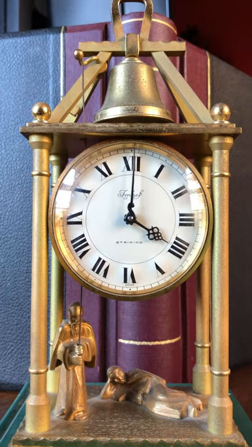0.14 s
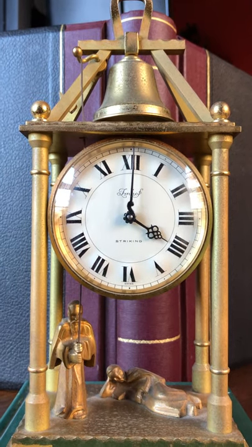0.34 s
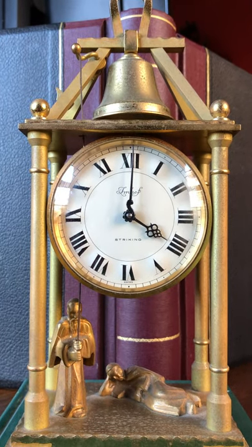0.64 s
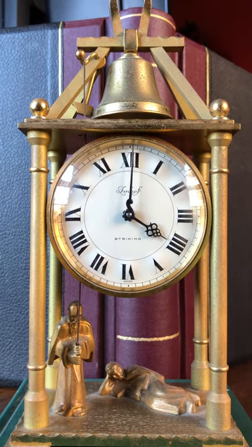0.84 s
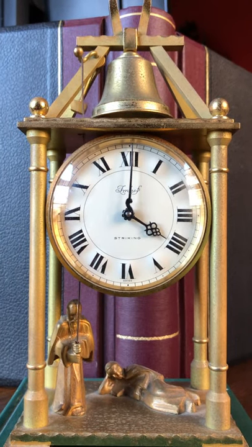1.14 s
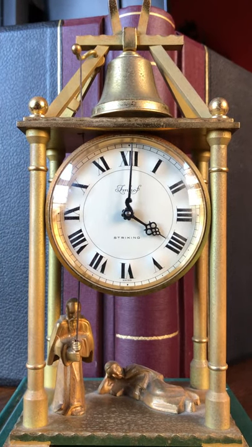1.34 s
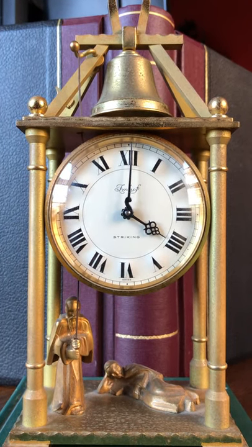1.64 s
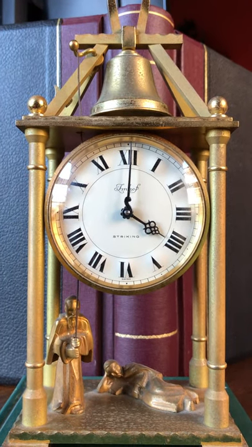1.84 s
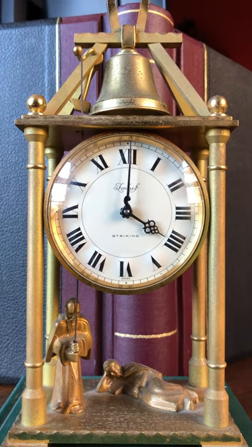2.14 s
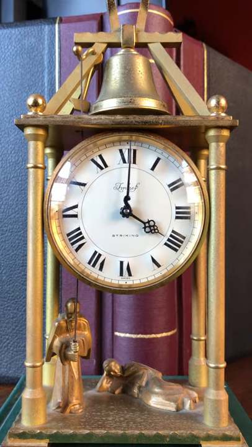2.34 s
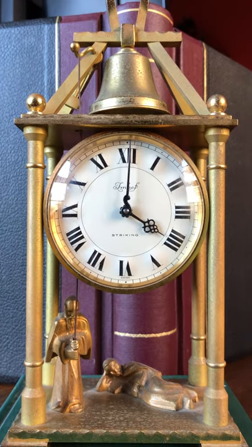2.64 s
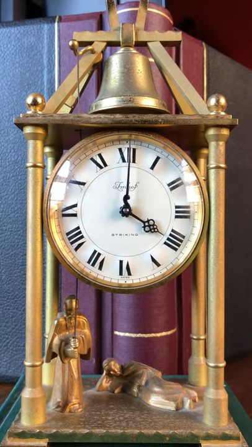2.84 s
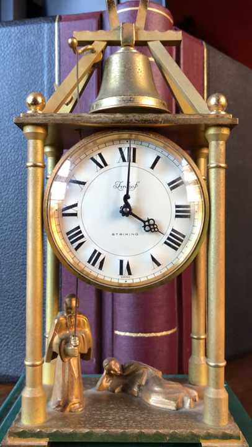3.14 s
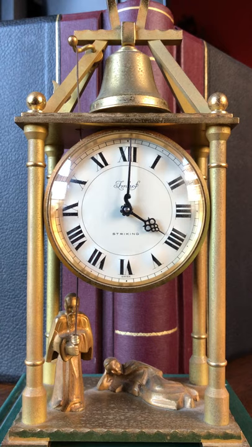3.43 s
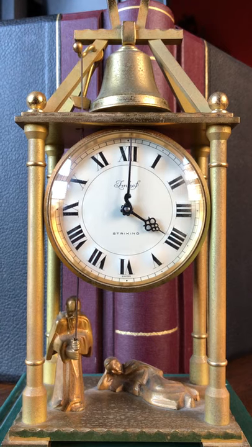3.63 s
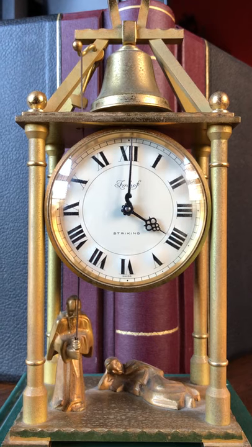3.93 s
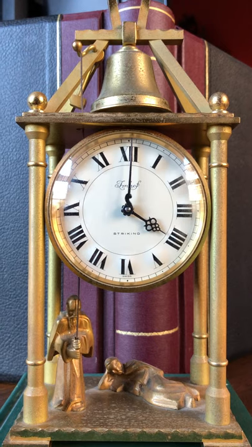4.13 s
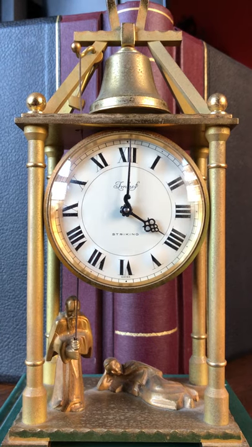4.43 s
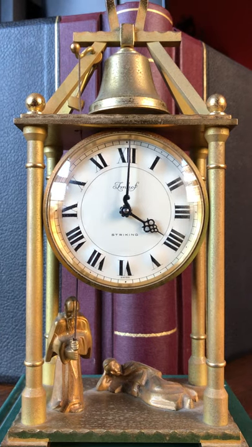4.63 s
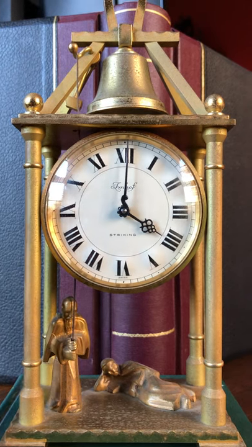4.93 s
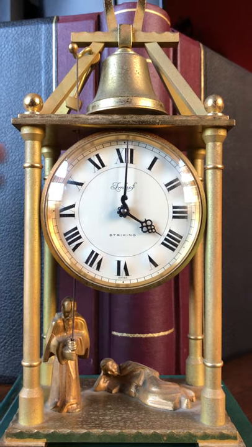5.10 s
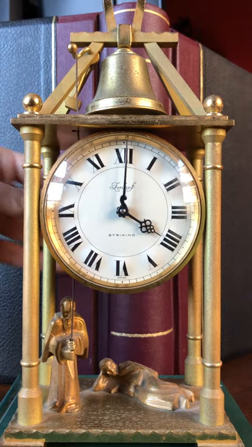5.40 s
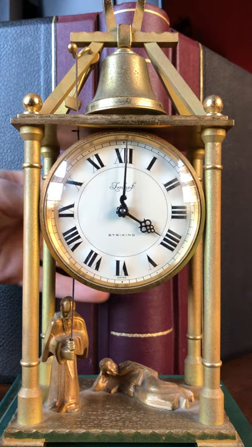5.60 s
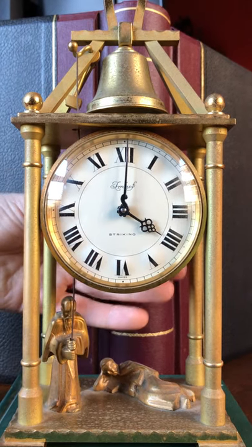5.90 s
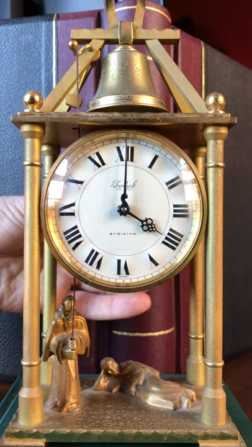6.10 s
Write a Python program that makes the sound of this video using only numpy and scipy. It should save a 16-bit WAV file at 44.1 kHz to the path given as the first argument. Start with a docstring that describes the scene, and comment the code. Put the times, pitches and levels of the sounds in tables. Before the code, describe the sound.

A small mechanical clock strikes three evenly spaced notes on its bell, each a sharp hit with a bright, shimmering ring that dies away. Quick, light ticking runs throughout, with a soft gear whirr that ends after the last stroke. A few faint, dull bumps and finger taps on the case follow. The microphone is close, and the room is quiet apart from a distant, slow pendulum clock.

```python
"""A small brass mantel clock strikes its last three hours, close by in a quiet room, over the ring of the
stroke before. Its escapement ticks five times a second and the fly of its striking train whirrs.
For each stroke the hammer trips, hits the bell and is picked up again. A slower pendulum clock tocks
farther off. At the end a hand bumps and taps behind the case."""
import sys
import numpy as np
from scipy import signal
from scipy.fft import rfft, irfft
from scipy.io import wavfile

SR = 44100
rng = np.random.default_rng(int(sys.argv[2]) if len(sys.argv) > 2 else 0)


def unload_audio(sound):
    """Save the sound as a 16-bit wav file, at the path given as the first command line argument."""
    columns = np.transpose(np.atleast_2d(sound))
    # keep every value between -1 and 1, then stretch to whole-number steps
    steps = np.round(np.clip(columns, -1, 1) * 32767)
    wavfile.write(sys.argv[1], SR, steps.astype(np.int16))


N = 276065
TIME = np.arange(N) / SR

# hammer on bell: t/s, level/dB, t60 factor of first mode, extra level of second mode pair/dB
STROKES = [(-0.6, -1, 1.074, -1.5), (0.7651, -1.1, 1.06, -1), (2.0985, -0.32, 1, 0.5),
           (3.5930, -0.7, 1.29, 1.5)]


def from_db(db):
    """Level to amplitude."""
    return 10 ** (np.asarray(db) / 20)


def colour(x, spectrum):
    """Minimum-phase filter from rows of f/Hz, level/dB; white noise keeps its power."""
    size = 4096
    hz, db = np.transpose(spectrum)
    bins_hz = np.fft.rfftfreq(size, 1 / SR)
    gain = from_db(np.interp(np.log(bins_hz + 1), np.log(hz), db))
    gain /= np.sqrt(np.mean(gain ** 2))
    cepstrum = irfft(np.log(gain))[:size // 2]
    cepstrum[1:] *= 2
    impulse_response = irfft(np.exp(rfft(cepstrum, size)))
    return signal.fftconvolve(x, impulse_response)[:N]


def noise(spectrum):
    """Steady coloured noise, rms about 1."""
    return colour(rng.standard_normal(N), spectrum)


def bursts(contacts):
    """Each contact (t/s, level/dB, decay/s) is a dying flurry of tiny impacts."""
    power = np.zeros(N)
    for t, db, decay_s in contacts:
        start = int(np.clip(t * SR, 0, N - 1))
        age = TIME[:min(N - start, int(10 * decay_s * SR))]
        power[start:start + len(age)] += (from_db(db) * np.exp(-age / decay_s)) ** 2
    return np.sqrt(power) * rng.standard_normal(N)


def struck(hits, modes):
    """Each hit (t/s, level/dB) rings the modes (f/Hz, level/dB, t60/s)."""
    clicks = np.zeros(N)
    for t, db in hits:
        clicks[int(t * SR)] += from_db(db)
    age = TIME[:SR]
    ring = sum(from_db(db - 60 * age / t60_s) * np.sin(2 * np.pi * hz * age) for hz, db, t60_s in modes)
    return signal.fftconvolve(clicks, ring)[:N]


def room(x, wet_db, t60_s):
    """Adds a diffuse tail of reflections."""
    age = TIME[:SR // 2]
    tail = rng.standard_normal(len(age)) * from_db(-60 * age / t60_s) * (age > .003)
    return x + from_db(wet_db) * signal.fftconvolve(x, tail / np.linalg.norm(tail))[:N]


def bell(friction_db_per_s2=5.0, contact_s=.00012, reflections_s=.022):
    """Split modes beat; mount friction hastens their end; early reflections swell or thin each one."""
    # bell modes, first four in beating pairs: f/Hz, level/dB, t60/s, amplitude ratio direct/settled
    modes = [(3656.4, -34.5, 2.8, 1.3), (3678.4, -24.7, 1.13, .95), (8190.5, -35, 1.02, 1.6),
             (8212.5, -26, 1.28, -.6), (10528, -13.8, .21, 1.1), (13329.3, -17, .46, .45),
             (13421, -32, .4, 1.2), (14497, -36.5, .42, 1.2), (14621, -27, .39, .8), (7026, -53, .42, 1.0),
             (7335, -56, .42, 1.0), (7357, -54, .42, 1.0), (7690, -59, .32, 1.0), (8379, -50, .25, 1.0),
             (3012, -63, .45, 1.0)]
    out = np.zeros(N)
    for t, stroke_db, t60_factor, pair_db in STROKES:
        start = max(int(t * SR) + 1, 0)
        for k, (hz, db, t60_s, direct) in enumerate(modes):
            t60_s *= t60_factor if k == 0 else 1
            age = TIME[start:start + int(2 * t60_s * SR)] - t
            onset_db = stroke_db + db + (pair_db if k in (2, 3) else 0)
            decay = from_db(onset_db - 60 * age / t60_s - friction_db_per_s2 * age ** 2)
            attack = 1 - np.exp(-(age / contact_s) ** 2 / 2)
            settling = 1 + (direct - 1) * np.exp(-age / reflections_s)
            out[start:start + len(age)] += decay * attack * settling * np.sin(2 * np.pi * hz * age)
    return room(out, wet_db=-22.5, t60_s=.25)


def background(air_db=-69, hiss_db=-79.5):
    """Low room noise and faint hiss."""
    # spectra: f/Hz, level/dB
    air = [(15, -62.5), (25, -27.5), (40, -13.5), (69, -9), (152, -5.5), (178, -6.5), (312, -4), (475, -17),
           (536, -15), (668, -17), (800, -19), (1680, -26.5), (2090, -27.5), (2460, -28), (3000, -31),
           (3900, -65.5), (6600, -120)]
    hiss = [(2000, -19.5), (3200, -1), (8000, -2.5), (12000, -7.5), (16000, -5.5)]
    return from_db(air_db) * noise(air) + from_db(hiss_db) * noise(hiss)


def striking_train(free_db=-66.5, load_db=5.5, lock_s=4.03, stop_db_per_s=900):
    """The fly knocks in its bearing on most turns while gears rub; both grow as the hammer is raised."""
    # fly, racing after a blow, slowed by the lift: t/s, speed/(turns/s)
    speed = [(0.0, 45.7), (0.3, 49.5), (0.7, 49.1), (1.1, 57.4), (1.55, 51.4), (1.95, 48.7), (2.35, 53.9),
             (2.7, 44.7), (3.1, 44.0), (3.5, 51.3), (4.0, 55.2)]
    # bearing and plate modes: f/Hz, level/dB, t60/s
    bearing_modes = [(2216, -5, 0.031), (3390, -1, .018), (5080, 3, .014), (6190, -1.5, 0.02),
                     (7060, -2.5, 0.029), (8400, -8.5, 0.0078), (9470, -8.5, 0.013), (11160, 0, 0.028),
                     (11230, -7.5, 0.026), (13160, -11, 0.017)]
    # bearing grit and gear rub spectra: f/Hz, level/dB
    grit_spectrum = [(1000, -9), (2500, -8.5), (3400, -1), (4300, -5.5), (5600, -4), (7500, 5),
                     (9500, -2.5), (10300, -10.5), (11300, -3.5), (12500, -8.5), (15500, -9)]
    rub_spectrum = [(500, -8.5), (1000, -4.5), (1800, -9.5), (2170, 10), (2450, -3), (3300, 5),
                    (4300, -2.5), (5100, -4), (8000, -0.5), (11000, -2), (15500, -12.5)]
    click_db, spread_db, skip_share = -2, 3.5, .12
    grit_db, grit_s, rub_db = 3, .0014, -11
    turns = np.cumsum(np.interp(TIME, *np.transpose(speed))) / SR
    turns_s = TIME[1:][np.diff(np.floor(turns)) > 0]
    clicks = [(t, click_db + spread_db * rng.uniform(-1, 1))
              for t in turns_s if rng.random() > skip_share]
    grit = colour(bursts([(t, db + grit_db, grit_s) for t, db in clicks]), grit_spectrum)
    chatter = room(struck(clicks, bearing_modes) + grit, wet_db=-10.5, t60_s=.18)
    # 0 just after a blow, 1 at the next
    lift = np.interp(TIME, [t for t, *_ in STROKES], np.arange(len(STROKES))) % 1
    level_db = free_db + load_db * lift - stop_db_per_s * np.clip(TIME - lock_s, 0, 1)
    return from_db(level_db) * (chatter + from_db(rub_db) * noise(rub_spectrum))


def escapement(first_s=.0713, tooth_s=.3938, tock_lag_s=.1883, tick_db=-53, tock_db=-55):
    """Each tooth gives a sharp tick and a softer tock, each led by a faint touch of the pallet."""
    # contact spectrum: f/Hz, level/dB
    spectrum = [(1180, -42.5), (2000, -19.5), (2360, -17.5), (3140, -2.5), (3430, -1), (3980, -3.5),
                (4570, -11), (5120, -8), (6530, -8.5), (8480, -2.5), (10100, -8.5), (11200, -2),
                (12100, -14.5), (13900, -7), (16000, -20.5)]
    decay_s, touch_lead_s, touch_db = .0031, .048, -18.5
    teeth, wobble_s, latest_tooth = 15, .003, 7.4   # off-centre wheel: late, then early, once a turn
    tooth = np.arange(int(N / SR / tooth_s) + 1)
    late_s = wobble_s * np.cos(2 * np.pi * (tooth - latest_tooth) / teeth)
    ticks_s = first_s + tooth * tooth_s + late_s
    beats = [(t + lag_s, db, decay_s)
             for t in ticks_s for lag_s, db in [(0, tick_db), (tock_lag_s, tock_db)]]
    touches = [(t - touch_lead_s, db + touch_db, decay_s) for t, db, _ in beats]
    clicks = colour(bursts(beats + touches), spectrum)
    return room(plates(clicks), wet_db=-10, t60_s=.059)


def plates(x):
    """The movement's brass plates add narrow resonances to whatever hits them."""
    # plate resonances: f/Hz, width/Hz, level re input/dB
    resonances = [(3260, 60, 4), (3570, 52, 4), (3908, 80, 5), (5083, 170, 10), (6253, 60, 0.5),
                  (6930, 261, 3.5), (8230, 76, 7.5), (9530, 50, -4.5), (10920, 76, 3.5), (11190, 69, 11),
                  (11460, 80, 12), (13250, 90, 1.5), (14350, 35, 13.5)]
    out = x.copy()
    for hz, width_hz, db in resonances:
        radius = np.exp(-np.pi * width_hz / SR)
        b = np.array([1, 0, -1]) * (1 - radius ** 2) / 2
        a = [1, -2 * radius * np.cos(2 * np.pi * hz / SR), radius ** 2]
        out += from_db(db) * signal.lfilter(b, a, x)
    return out


def far_clock(first_s=.458, period_s=1.4835, tock_lag_s=.771, tick_db=-67, tock_db=-65.5, decay_s=.028):
    """One tick and one tock per pendulum period, reverberant with distance."""
    # beat spectra: f/Hz, level/dB
    tick_spectrum = [(400, -10), (1000, -1.5), (1170, -5), (1270, 8), (1380, -11.5), (2000, -6),
                     (2800, -7.5), (4000, -16), (7500, -18), (12000, -22)]
    tock_spectrum = [(400, -20), (900, -5), (1400, -18), (2050, -21), (2280, 4.5), (2450, -4), (2650, -8),
                     (2850, -9.5), (4000, -19.5), (7500, -20), (12000, -30)]
    ticks_s = np.arange(first_s, N / SR, period_s)
    tick = colour(bursts([(t, tick_db, decay_s) for t in ticks_s]), tick_spectrum)
    tock = colour(bursts([(t + tock_lag_s, tock_db, decay_s) for t in ticks_s]), tock_spectrum)
    return room(tick + tock, wet_db=3.5, t60_s=.31)


def hammer_work():
    """Before each blow the lever pings and the linkage rattles; a soft knock picks the hammer up again."""
    # lever slips off its pin in two steps: lead/s, level/dB
    slips = [(.0452, -51), (0.033, -45)]
    # linkage contacts as the hammer falls: lead/s, level/dB, decay/s
    fall_contacts = [(.0405, -55, 0.0068), (.031, -42.5, 0.0075), (.0113, -44, 0.0036)]
    # rattle spectrum: f/Hz, level/dB
    rattle_spectrum = [(200, -9.5), (320, -10.5), (550, -13.5), (900, 2), (1300, -5), (1900, -3.5),
                       (2700, -1), (3800, 3.5), (4600, -6.5), (6600, -4.5), (9000, -16.5), (16000, -35)]
    # hammer pick-up: t/s, level/dB
    knocks = [(1.030, -68), (1.099, -62.5), (2.4275, -56.5), (2.437, -65), (3.9481, -65.5)]
    # lever and linkage modes: f/Hz, level/dB, t60/s
    lever_modes = [(9500, 3, 0.038), (13770, -12, .078)]
    linkage_modes = [(615, 1, 0.14), (780, 6.5, 0.027), (920, -24, 0.044), (1435, -6, 0.045),
                     (1846, -4.5, 0.047)]
    blows_s = [t for t, *_ in STROKES if t > 0]
    ping = struck([(t - lead_s, db) for t in blows_s for lead_s, db in slips], lever_modes)
    falls = [(t - lead_s, db, decay_s) for t in blows_s for lead_s, db, decay_s in fall_contacts]
    rattle = room(colour(bursts(falls), rattle_spectrum), wet_db=-3.5, t60_s=.41)
    knock = room(struck(knocks, linkage_modes), wet_db=-5.5, t60_s=.22)
    return ping + rattle + knock


def blows(crack_db=-21, crack_s=.0015, jangle_db=-27, jangle_s=.008, thud_lag_s=.007):
    """The hammer cracks on the bell, its arm jangles, and the recoil thuds through the case."""
    # hammer contact spectrum: f/Hz, level/dB
    crack_spectrum = [(60, -33.5), (200, -22.5), (520, -21), (900, -14.5), (1500, -24), (2200, -10.5),
                      (2800, -8.5), (3900, 1.5), (5300, -5), (7500, -1.5), (8500, 4), (11000, -8),
                      (14000, -1.5), (16000, -6.5)]
    # case and table modes: f/Hz, level/dB, t60/s
    case_modes = [(331, -40, .17), (356, -53, .09)]
    hits = [(t, db) for t, db, *_ in STROKES if t > 0]
    contacts = [(t, db + crack_db, crack_s) for t, db in hits]
    jangles = [(t, db + jangle_db, jangle_s) for t, db in hits]
    crack = colour(bursts(contacts + jangles), crack_spectrum)
    recoil = struck([(t + thud_lag_s, db) for t, db in hits], case_modes)
    low_cut = signal.butter(2, 160, "high", fs=SR, output="sos")   # a small case radiates little bass
    thud = signal.sosfilt(low_cut, recoil)
    return room(crack, wet_db=-11, t60_s=.13) + room(thud, wet_db=-8.5, t60_s=.68)


def hand():
    """Dull bumps on table and case; finger taps on the clock's back stir the brass."""
    # contacts: t/s, level/dB, decay/s
    bumps = [(4.94, -54.5, 0.019), (5.693, -57.5, 0.019), (5.938, -57, 0.045), (6.142, -55, 0.05),
             (6.178, -56, 0.036)]
    taps = [(6.056, -53.5, 0.0086), (6.105, -59.5, 0.0071)]
    # their spectra: f/Hz, level/dB
    bump_spectrum = [(40, -11), (110, -7.5), (190, 7), (280, -18), (410, -10), (600, -28), (2000, -41)]
    tap_spectrum = [(290, -41), (500, -11), (909, 7.5), (1610, -29), (2260, -5), (2880, -14), (3270, -9),
                    (3610, -22), (4540, -8), (5380, -27), (5950, -3.5), (6570, -17), (15000, -25)]
    bumping = colour(bursts(bumps), bump_spectrum)
    tapping = plates(colour(bursts(taps), tap_spectrum))
    return bumping + room(tapping, wet_db=-12, t60_s=.26)


def scene():
    """All sources at one microphone, alike in both channels."""
    clock = bell() + blows() + hammer_work() + escapement() + striking_train()
    return np.tile(clock + background() + far_clock() + hand(), (2, 1))


def record(dry, cutoff_hz=15900):
    """Steep low-pass."""
    return signal.sosfilt(signal.ellip(10, .1, 80, cutoff_hz, fs=SR, output="sos"), dry)


dry = scene()
out = record(dry)
unload_audio(out)
```